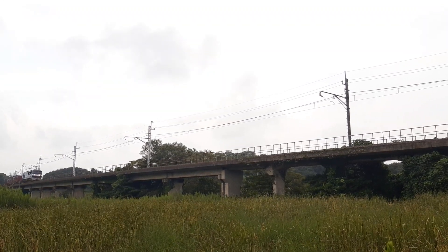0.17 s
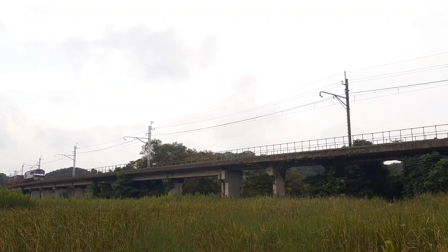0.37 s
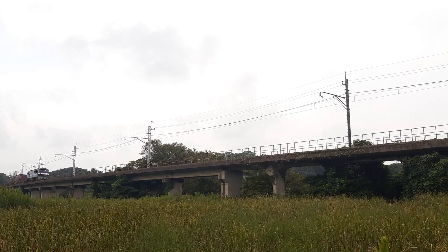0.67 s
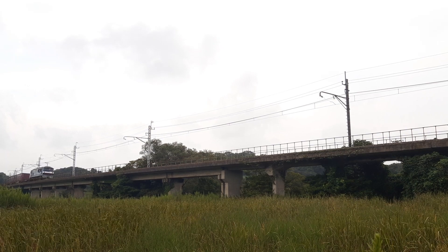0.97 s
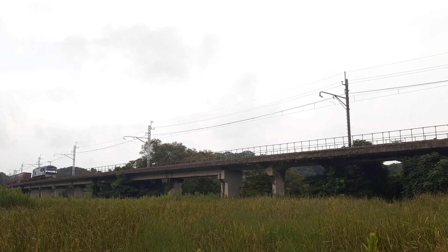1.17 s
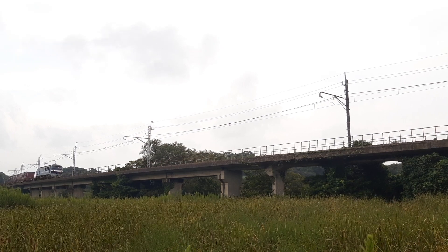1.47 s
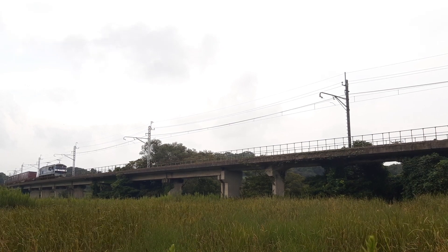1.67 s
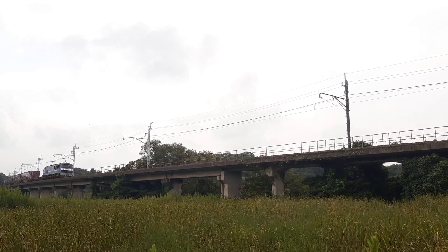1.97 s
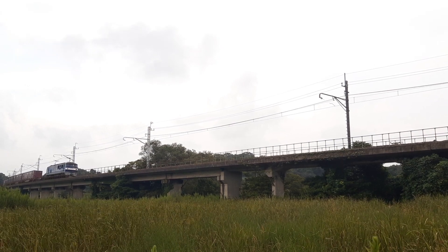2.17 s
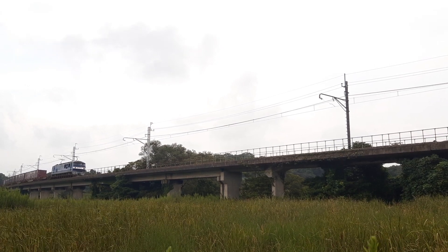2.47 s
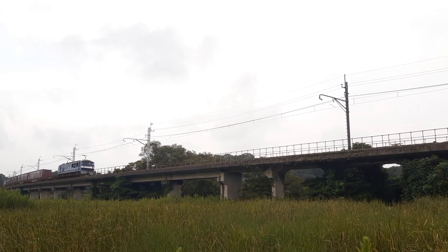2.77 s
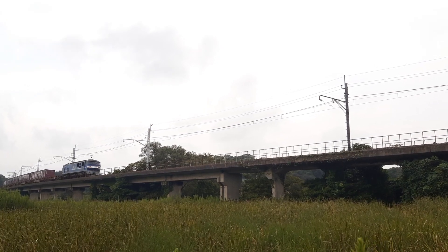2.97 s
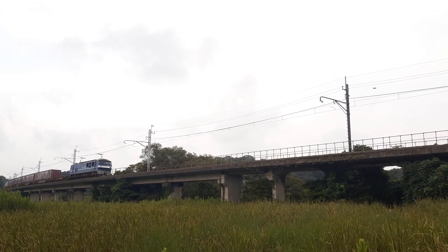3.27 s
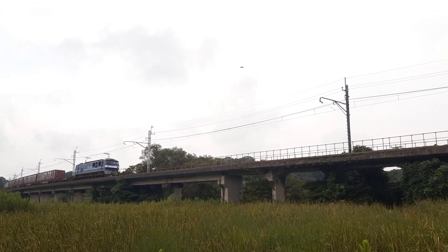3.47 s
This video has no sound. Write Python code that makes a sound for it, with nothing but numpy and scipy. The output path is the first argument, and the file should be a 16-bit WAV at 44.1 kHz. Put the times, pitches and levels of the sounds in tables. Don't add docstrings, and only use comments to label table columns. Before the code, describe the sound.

Low rolling roar of a goods train on a bridge, left of the microphone, thudding over joints with light clangs, swelling near the end with a brief flange squeal; quiet insects and outdoor air around.

```python
import sys
import numpy as np
from scipy import signal
from scipy.fft import rfft, irfft
from scipy.io import wavfile

SR = 44100
rng = np.random.default_rng(int(sys.argv[2]) if len(sys.argv) > 2 else 0)


def to_linear_factor(level_db):
    exponent = np.asarray(level_db, float) / 20
    return 10 ** exponent


def master(y):
    cut = np.clip(np.atleast_2d(y).T, -1, 1)
    pcm = np.round(cut * 32767)
    wavfile.write(sys.argv[1], SR, pcm.astype(np.int16))


N = 159201
T = np.arange(N) / SR
BIN_HZ = np.fft.rfftfreq(N, 1 / SR)

# start_s, deck_force_db, girder_sway_db, flange_rub_db
ROLL = [(0.0, -38.5, -38.5, -53.5), (0.4, -38.5, -36.5, -55), (0.96, -38, -39.5, -52.5),
        (1.12, -40.5, -36, -52), (1.3, -38.5, -34.5, -47.5), (1.4, -38, -34, -51.5),
        (1.6, -36.5, -34.5, -51), (1.98, -35.5, -33, -49), (2.25, -37.5, -37, -50.5), (2.46, -35, -37, -51),
        (2.7, -38, -31, -50.5), (2.82, -32, -30, -49), (2.98, -31, -28.5, -45.5), (3.15, -30.5, -33.5, -43),
        (3.35, -31, -33.5, -44.5), (3.61, -31, -33, -42)]
# start_s, deck_blow_db, wheel_blow_db, rim_tuning (ratio)
JOINTS = [(0.138, -24.5, -42.5, 1), (0.279, -30.5, -46, 0.92), (0.442, -33, -47, 0.97),
          (0.586, -32, -47, 1.0), (0.754, -31.5, -46, 0.91), (.885, -33, -49, 1.0),
          (1.131, -30.5, -49, 1.16), (1.25, -34.5, -51.5, 0.9), (1.475, -31, -49.5, 1.07),
          (1.632, -37, -46.5, 0.95), (1.772, -29.5, -47.5, 0.98), (1.975, -53, -52, 1.05),
          (2.098, -32.5, -46, 1.08), (2.238, -31, -69, 0.9), (2.585, -37, -47, 1.0),
          (2.789, -26.5, -44.5, 0.96), (2.932, -26, -43, 0.98), (3.109, -28.5, -46, 1.14),
          (3.237, -29, -61, 1.3), (3.42, -27.5, -71, 1.2), (3.538, -25, -44.5, 1.27)]


def evened(x):
    return x / np.sqrt(np.mean(x ** 2) + 1e-20)


def read(points, hz, axis=1):
    p = np.transpose(points)
    return np.interp(np.log(hz + 1), np.log(p[0] + 1), p[axis])


def curve(points, axis):
    p = np.transpose(points)
    return np.interp(T, p[0], p[axis])


def drift(per_s):
    slowed = rfft(rng.standard_normal(N)) / (1 + (BIN_HZ / per_s) ** 2)
    return evened(irfft(slowed * (BIN_HZ > .5), N))


def noise(colour):
    white = rfft(rng.standard_normal((2, N)))
    return evened(irfft(white * to_linear_factor(read(colour, BIN_HZ)), N))


def resonate(x, hz, width):
    turn = np.exp(2j * np.pi * np.cumsum(hz * np.ones(N)) / SR)
    r = np.exp(-np.pi * width * 1.5 / SR)
    smooth = signal.lfilter([(1 - r) ** 2], [1, -2 * r, r * r], x / turn)
    return 2 * (turn * smooth).real


def ringing(hz, width):
    return evened(resonate(rng.standard_normal((2, N)), hz, width))


def blows(rise_s, t60_s, axis):
    joints = np.array(JOINTS)
    age = np.maximum(T - joints[:, :1], 0)
    level = to_linear_factor(joints[:, axis:axis + 1] - 60 * age / t60_s) * np.minimum(age / rise_s, 1)
    return np.sqrt((level ** 2).sum(0))


def deck(shake):
    # pitch_hz, density_db (per Hz)
    roar_colour = [(40, -15.5), (110, 3), (200, -5), (600, -6), (760, -18.5), (1000, -15), (1300, -26.5),
                   (2500, -61)]
    # pitch_hz, density_db (per Hz)
    knock_colour = [(80, -66), (250, -0.5), (560, -2), (760, -17.5), (1020, -9), (1400, -33.5),
                    (3000, -25.5), (6500, -59)]
    roar = noise(roar_colour) * to_linear_factor(curve(ROLL, axis=1) + 2.5 + 0.97 * shake)
    return roar + noise(knock_colour) * blows(rise_s=.012, t60_s=.25, axis=1)


def girders():
    # pitch_hz, width_hz, level_db
    girder_modes = [(67.75, 14.5, -2), (84.1, 23.7, -7), (132.7, 15.5, -13), (296.3, 26, -15.5)]
    hum = sum(to_linear_factor(db) * np.tanh(0.93 * ringing(hz, width)) for hz, width, db in girder_modes)
    return evened(hum) * to_linear_factor(curve(ROLL, axis=2))


def sways():
    # middle_s, length_s, pitch_hz, level_db
    swells = [(0.358, 0.071, 66.5, -26.5), (0.573, 0.058, 68, -33), (0.677, 0.081, 59.5, -29.5),
              (0.991, 0.13, 64.4, -28), (1.153, .08, 70, -33), (1.821, .07, 69, -33),
              (1.274, 0.07, 67, -27), (1.473, .1, 70.4, -33), (1.702, 0.11, 64, -30),
              (2.03, 0.17, 72.3, -31), (2.181, 0.15, 71.6, -26.5), (2.267, 0.093, 68.6, -28),
              (2.483, .09, 70, -27), (2.759, 0.13, 70, -30), (2.922, 0.13, 71, -26), (3.012, .14, 70, -27),
              (3.098, 0.081, 74, -32), (3.281, 0.082, 68, -25), (3.432, 0.079, 67, -27.5),
              (3.541, 0.23, 67.3, -23), (.46, 0.11, 131, -33.5), (0.688, 0.089, 119, -32.5),
              (0.868, .08, 117, -35.5), (1.03, 0.066, 130, -32), (1.37, .08, 139, -36.5),
              (1.5, 0.17, 108, -33), (1.848, 0.12, 131, -33.5), (2.96, 0.062, 136, -33.5),
              (3.24, 0.05, 132, -27)]
    s, length, hz, db = np.transpose(swells)[:, :, None]
    u = np.clip((T - s) / length + .5, 0, 1)
    tone = np.sin(2 * np.pi * (hz * (T - s) + rng.random((len(swells), 1))))
    return (to_linear_factor(db - 1.5) * np.sin(np.pi * u) * tone).sum(0)


def wheels(shake):
    # pitch_hz, width_hz, rubbed_db, struck_db, left_minus_right_db
    rim_modes = [(1330, 140, -1.5, 4.5, -9), (1802, 167, 3.5, 7, -3.5), (2286, 294, 2.5, 5, -8),
                 (2615, 290, -9, -1, -15.5), (3050, 91, -17, -15, -3), (3450, 130, -1, -8, -3.5),
                 (3710, 200, 0.5, -2.5, -5), (4280, 420, -3.5, -1.5, -1.5), (4807, 83, -8, -4, -0.5),
                 (5110, 190, -11, -9, 2), (5480, 42, -12.5, -13.5, -1)]
    # pitch_hz, density_db (per Hz)
    hiss_colour = [(700, -0.5), (1400, -6.5), (3600, 0.5), (5000, -6.5), (6200, -15), (7800, -37.5),
                   (10000, -30), (16000, -22)]
    rub = to_linear_factor(curve(ROLL, axis=3) + 0.5 * shake)
    hit = blows(rise_s=.003, t60_s=.4, axis=2)
    p = np.transpose(JOINTS)
    latest = np.maximum(np.searchsorted(p[0], T) - 1, 0)
    tuning = np.clip(p[3], .96, 1.04)[latest]
    out = np.zeros((2, 2, N))
    for hz, width, rub_db, hit_db, pan_db in rim_modes:
        rubbed = ringing(hz, width) * rub * to_linear_factor(2 + rub_db + drift(1.3))
        struck = ringing(hz * tuning, width) * hit * to_linear_factor(hit_db)
        side_db = np.array([.5, -.5]) * (pan_db + 3.5) - 9.5
        out += (rubbed + struck) * to_linear_factor(side_db)[:, None, None]
    return out + noise(hiss_colour) * np.hypot(rub * to_linear_factor(1), hit * to_linear_factor(-5.5))


def flange_song():
    start_s, length_s = 3.12, 0.4
    # pitch_hz, width_hz, level_db, left_minus_right_db
    song_tones = [(2608, 14, -50, -5), (3330, 72, -57, 4), (3540, 120, -52, -14), (3670, 90, -59, 14),
                  (3950, 160, -52.5, -8), (4370, 140, -54, -10), (4770, 140, -51, -7),
                  (5280, 120, -56.5, -6), (5700, 200, -55.5, -2), (10600, 2100, -79, -1)]
    out = np.zeros((2, 2, N))
    for hz, width, db, pan_db in song_tones:
        side_db = db + 4.5 + np.array([.5, -.5]) * (pan_db + 5)
        out += np.tanh(ringing(hz, width)) * to_linear_factor(side_db)[:, None, None]
    return out * np.sin(np.pi * np.clip((T - start_s) / length_s, 0, 1))


def clangs():
    rise_s, split = .007, .03
    # start_s, pitch_hz, level_db, t60_s
    struck_parts = [(.145, 545, -24, .13), (.141, 1770, -39, .25), (.143, 1000, -36, .2),
                    (.141, 2400, -43, .3), (1.132, 1850, -41, .2), (1.258, 1830, -42, .3),
                    (.272, 520, -35, .3), (1.62, 480, -32, .25), (1.53, 560, -34, .25),
                    (.31, 1370, -42, .15), (.967, 650, -36, .15), (2.1, 2330, -47, .2),
                    (1.75, 1860, -48, .2), (1.475, 1030, -42, .25), (1.635, 1880, -45, .3),
                    (1.995, 1820, -43, .2), (2.11, 1800, -45, .25), (2.79, 1000, -41, .3),
                    (2.80, 1790, -45, .25), (2.99, 295, -30, .4), (3.15, 290, -32, .6),
                    (2.806, 620, -33, .2), (3.1, 570, -35, .2), (2.94, 345, -33, .2), (3.42, 850, -42, .25),
                    (3.47, 131, -30, 1.2), (2.59, 2400, -50, .2), (.77, 2400, -50, .2)]
    s, hz, db, t60 = np.transpose(struck_parts)[:, :, None]
    age = np.maximum(T - s, 0)
    pair = np.sin(2 * np.pi * hz * age) + 0.42 * np.sin(2 * np.pi * hz * (1 + split) * age)
    return (pair * to_linear_factor(db - 60 * age / t60) * np.minimum(age / rise_s, 1)).sum(0)


def place(train):
    left_lead_s, margin = .00016, 2048
    # pitch_hz, likeness (0-1), left_minus_right_db
    mic_pair = [(40.2, 1, -4.5), (150, 0.93, -3), (654, 0.92, -2), (1230, 0.57, -2.5), (3100, 0.48, -2.5),
                (4640, 0.43, -8), (6500, 0.16, -6.5), (16500, 0.16, 11)]
    size = N + 2 * margin - 1
    hz = np.fft.rfftfreq(size, 1 / SR)
    padding = ((0, 0), (0, 0), (margin, margin - 1))
    padded = np.pad(train, padding, "reflect", reflect_type="odd")
    z = rfft(padded * signal.windows.tukey(size, .02))
    same = np.clip(read(mic_pair, hz), 0, 1)
    pan = to_linear_factor(read(mic_pair, hz, axis=2) / 2)
    right = same * z[1, 0] + np.sqrt(1 - same ** 2) * z[1, 1]
    right = right * np.exp(-2j * np.pi * hz * left_lead_s)
    return irfft(np.array([z[0, 0] * pan, right / pan]), size)[:, margin:margin + N]


def cricket():
    chirp_hz, fall_hz, share = 3990, 300, .48
    # start_s, level_db
    trill = [(0, -60), (.5, -56), (1.05, -55.5), (1.4, -52.5), (1.75, -53.5), (1.95, -57), (2.3, -66),
             (2.7, -58), (3.61, -64)]
    # start_s, chirps_so_far (count)
    chirp_beat = [(0, -.29), (1.058, 20), (1.386, 26), (3.61, 67.86)]
    beat = curve(chirp_beat, axis=1) + share / 2 + 1
    u = np.minimum(beat % 1 / share, 1)
    each_pitch, each_level = rng.standard_normal((80, 2))[beat.astype(int)].T
    hz = chirp_hz + fall_hz * (.5 - u) + 40 * each_pitch
    level = to_linear_factor(curve(trill, axis=1) + 5 + 1.2 * each_level + drift(150.))
    tone = np.sin(2 * np.pi * np.cumsum(hz) / SR) * np.sin(np.pi * u) * level
    return np.array([tone * to_linear_factor(-2.5), np.roll(tone, 3) * to_linear_factor(1.5)])


def katydids():
    teeth_per_stroke = 5
    # strokes_per_s, first_stroke_s, start_db, end_db, left_minus_right_db
    singers = [(25.3, -0.0054, -66, -71, 8), (27.17, 0.0031, -68, -69, 11)]
    # pitch_hz, density_db (per Hz)
    wing_colour = [(8000, -45), (10000, -18), (12500, -4), (14000, 0), (16000, 0)]
    out = np.zeros((2, N))
    for per_s, first, db0, db1, pan_db in singers:
        u = ((T - first) * per_s + 0.015 * drift(3.0) + 0.081) % 1
        teeth = np.exp(-u / 0.36) * np.sin(np.pi * u * teeth_per_stroke) ** 2
        level_db = db0 + (db1 - db0) * T / T[-1] + np.array([[.5], [-.5]]) * pan_db
        out += noise(wing_colour) * evened(teeth) * to_linear_factor(level_db)
    return out


def meadow_air():
    # pitch_hz, density_db (per Hz)
    air_colour = [(200, -3.5), (3000, 0), (6000, -17), (7000, -4.5), (7700, -34), (8900, -63), (11500, -22),
                  (15500, -4.5)]
    return noise(air_colour) * to_linear_factor(-54.5 + np.array([[1.0], [-1.0]]) + 0.58 * drift(22.0))


def scene():
    shake = evened(drift(10.0) + 0.47 * drift(43.0))
    train = wheels(shake) + deck(shake) + girders() + sways() + flange_song() + clangs()
    return place(train) + cricket() + katydids() + meadow_air()


def band_limit(x):
    return signal.sosfilt(signal.butter(12, 15750, fs=SR, output="sos"), x)


def record(dry):
    cut = signal.sosfilt(signal.butter(3, 40, "high", fs=SR, output="sos"), dry)
    end = np.sin(np.pi / 2 * np.minimum(np.arange(N)[::-1] / 260, 1)) ** 2
    return band_limit(cut * end)


dry = scene()
out = record(dry)
master(out)
```